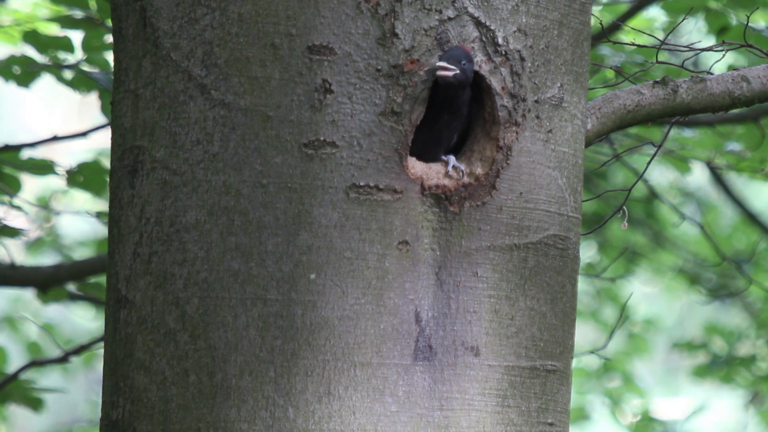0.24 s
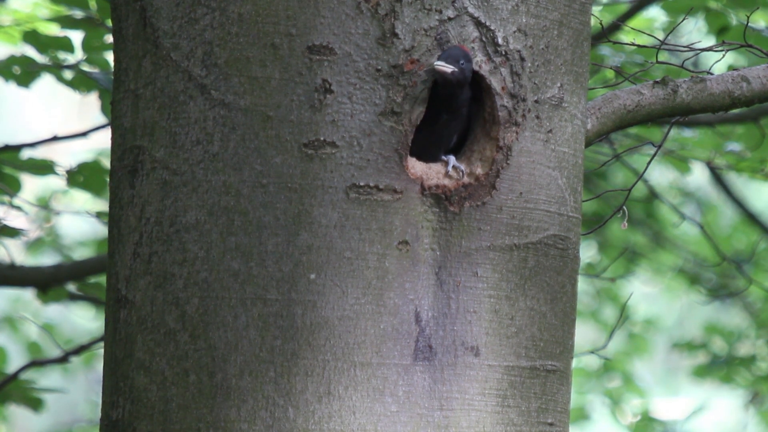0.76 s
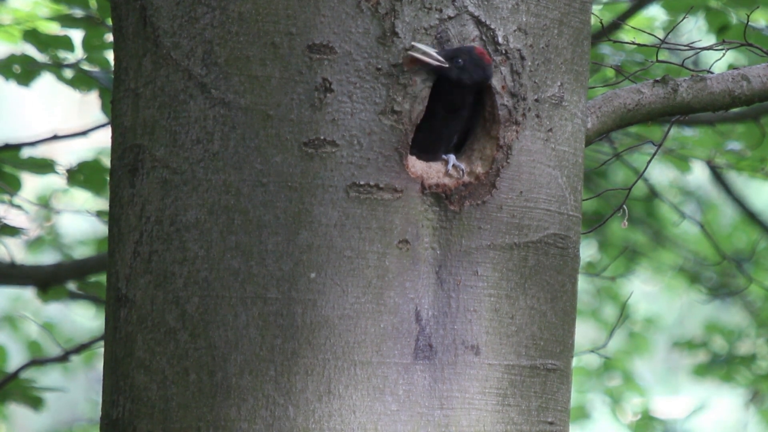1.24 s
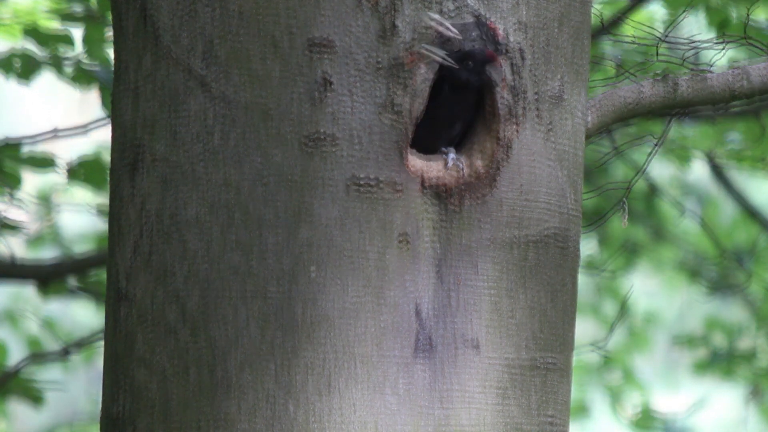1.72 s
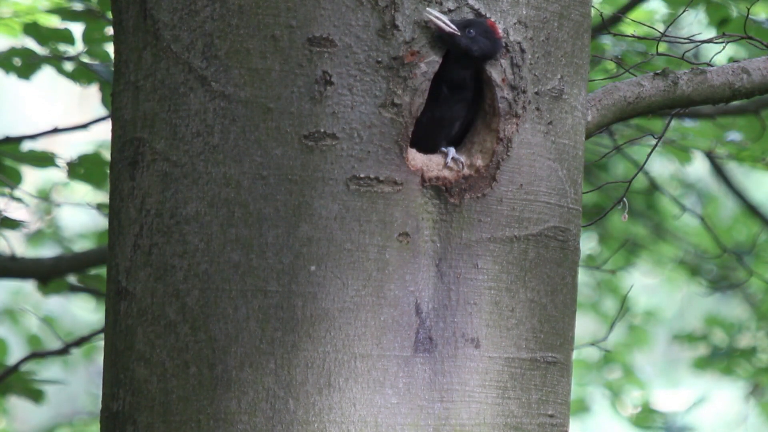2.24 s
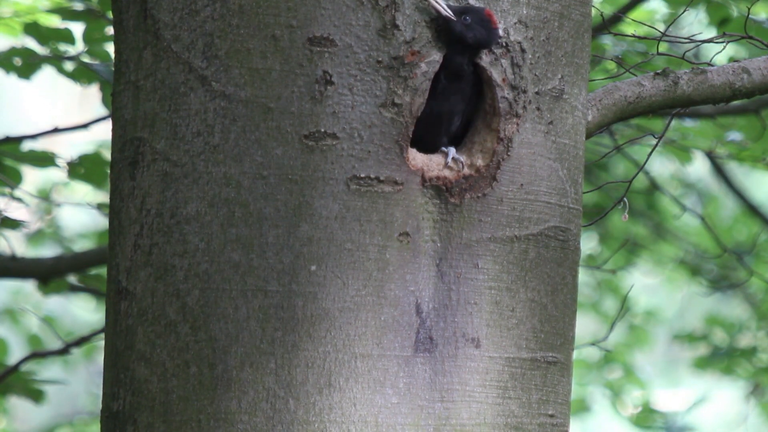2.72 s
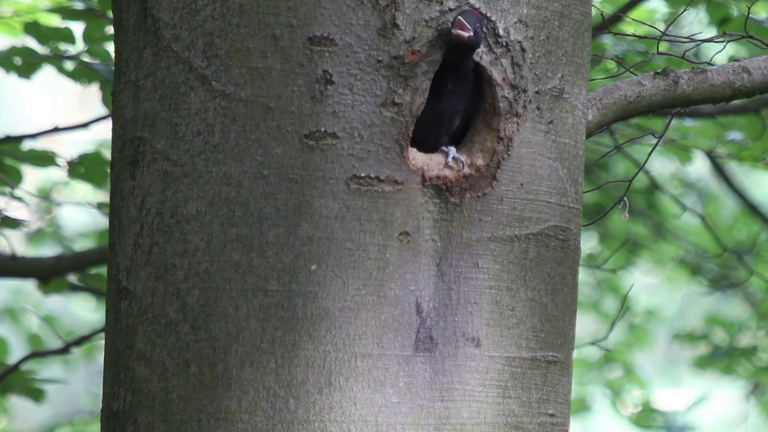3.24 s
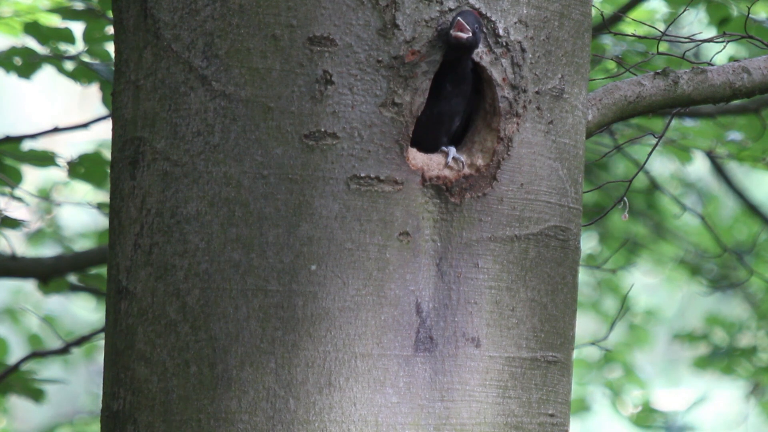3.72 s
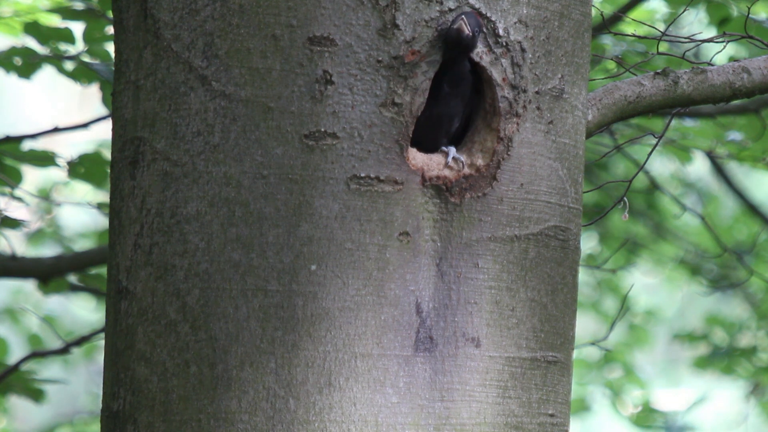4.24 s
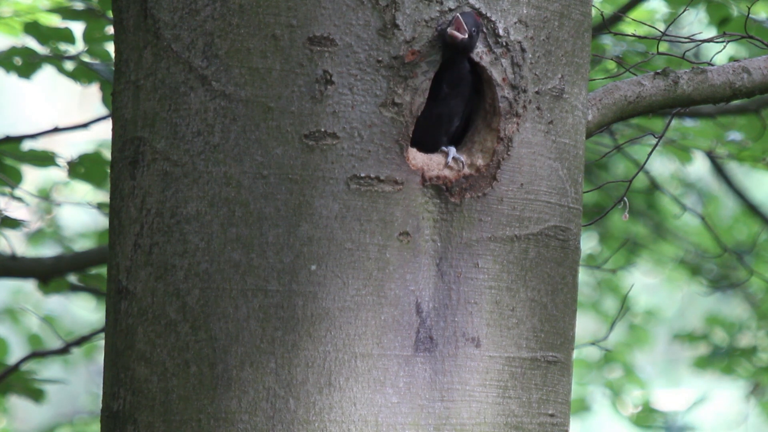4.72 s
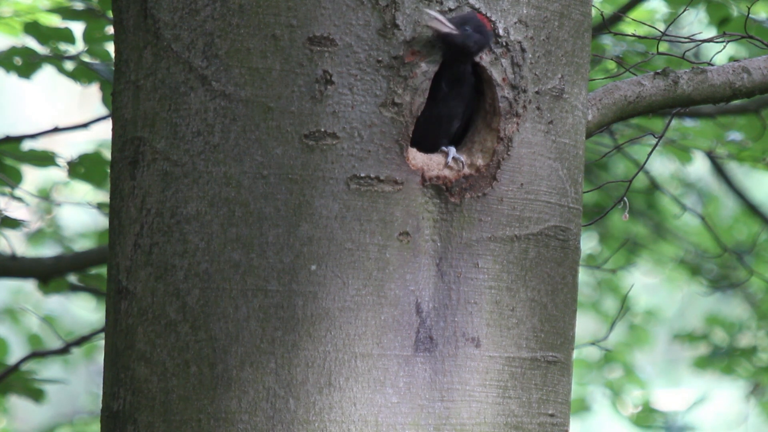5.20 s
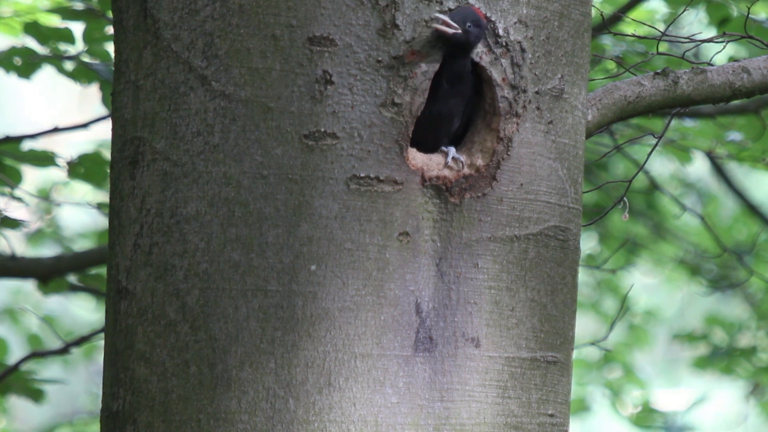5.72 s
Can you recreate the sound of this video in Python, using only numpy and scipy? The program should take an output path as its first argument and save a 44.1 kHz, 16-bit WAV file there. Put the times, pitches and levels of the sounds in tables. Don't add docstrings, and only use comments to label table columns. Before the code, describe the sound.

In a reverberant beech wood, a near finch opens with a fast trill ending in a flourish, then repeats falling sweeps and later trills again. A young woodpecker clucks softly, then gives a burst of short nasal yelps around two seconds. Bill snaps follow mid-way, the middle one hard, with faint hollow thuds. Fainter birds sing behind. Low traffic rumble, soft woodland wash and slight microphone hiss continue throughout.

```python
import sys
import numpy as np
from scipy import signal
from scipy.fft import rfft, irfft, next_fast_len
from scipy.io import wavfile
from scipy.ndimage import uniform_filter1d, map_coordinates

SR = 44100
rng = np.random.default_rng(int(sys.argv[2]) if len(sys.argv) > 2 else 0)


def volts_from_db(level):
    exponent = np.asarray(level, float) / 20
    return 10 ** exponent


def unload_wav(signal):
    wavfile.write(
        sys.argv[1],
        SR,
        np.round(np.clip(np.atleast_2d(signal).T, -1, 1) * 32767).astype(np.int16),
    )


N = 262836


def unit(x):
    return x / np.sqrt(np.mean(x ** 2) + 1e-20)


def along(points, hz):
    point_hz, value = np.transpose(points)
    return np.interp(np.log(hz + 1), np.log(point_hz + 1), value)


def wobble(rate_hz, size=N):
    knots = rng.standard_normal(int(size * rate_hz / SR) + 4)
    return map_coordinates(knots, [np.arange(size) * rate_hz / SR])


def add(track, start_s, sound):
    start = round(start_s * SR)
    part = track[max(start, 0):start + len(sound)]
    part += sound[max(-start, 0):][:len(part)]


def stroke(rows, rough, overtones):
    s, hz, db = np.transpose(rows)
    size = int((s[-1] - s[0]) * SR) + 2
    t = s[0] + np.arange(size) / SR
    glide_hz = uniform_filter1d(np.interp(t, s, hz), size=45)
    pitch_hz = glide_hz * (1 + .02 * rough * wobble(500, size=size))
    ends = np.clip(np.minimum(t - t[0], t[-1] - t) / .0015, 0, 1)
    level_db = np.interp(t, s, db) + 4.5 * min(rough, .7) * wobble(250, size=size)
    k = np.arange(1, 10)[:, None]
    phase = 2 * np.pi * np.cumsum(pitch_hz) / SR
    tones = volts_from_db(overtones(k, k * pitch_hz)) * np.sin(k * phase)
    return np.sqrt(2) * ends * volts_from_db(level_db) * tones.sum(0)


def wood(x, wet_db, echoes, onset_s):
    # (frequency [Hz], t60 [s])
    decay_t60 = [(1000, 0.54), (2500, 0.89), (3500, 0.96), (5000, 0.97), (8000, 0.35)]
    # (frequency [Hz], level [dB])
    scatter_colour = [(1200, 5.5), (2200, -4), (3200, -4.5), (4400, -7.5), (5500, -5.5), (7500, 0.5)]
    hz, t, z = signal.stft(rng.standard_normal(SR * 3 // 4), SR, nperseg=256)
    decay = volts_from_db(-60 * t / along(decay_t60, hz)[:, None])
    buildup = 1 - np.exp(-t / onset_s)
    tail = signal.istft(z * decay * buildup, SR, nperseg=256)[1]
    tail = volts_from_db(wet_db) * tail / np.linalg.norm(tail)
    for delay_s, db in echoes:
        add(tail, delay_s, volts_from_db(db) * unit(rng.standard_normal(90)) / np.sqrt(90))
    colour = volts_from_db(along(scatter_colour, np.fft.rfftfreq(len(tail), 1 / SR)))
    tail = irfft(rfft(tail) * colour, len(tail))
    wet = signal.fftconvolve(x, tail)
    index = np.arange(len(wet))
    knots = index[::700]
    waver = np.interp(index, knots, rng.standard_normal(len(knots)))
    wet = np.interp(index + 7 * waver, index, wet)
    add(wet, 0, x)
    return wet


def yelp(high_s, plateau_s, hz, db):
    high_hz, step_s, fall_s, fall_hz = 1650, .003, .0095, 320
    onset_db, push_db_per_s, fade_db = -6, 800, -3
    top_db = db + push_db_per_s * high_s
    return [(0, .95 * high_hz, top_db + onset_db),
            (.6 * high_s, 1.03 * high_hz, top_db),
            (high_s, .97 * high_hz, top_db - 5),
            (high_s + step_s, hz, db),
            (plateau_s, hz, db),
            (plateau_s + fall_s, hz - fall_hz, db + fade_db)]


def woodpecker(wet_db, echoes, onset_s):
    # (time [s], high part [s], plateau end [s], plateau pitch [Hz], plateau level [dB])
    yelp_table = [
        (1.712, .001, .016, 1452, -37),
        (1.9635, .002, .016, 1275, -41.5),
        (2.122, .007, .013, 1280, -40.5),
        (2.369, .005, .013, 1270, -40.5),
        (2.584, .0095, .018, 1265, -40.5),
    ]
    # (time [s], peak level [dB], pitch [Hz], second harmonic [dB])
    cluck_table = [(0.0252, -39, 1700, -18), (0.2028, -44, 1660, -11), (0.451, -44, 1636, -5),
                   (1.7123, -41, 1730, -20), (2.122, -44, 1725, -20), (1.7994, -34.5, 1778, -14),
                   (2.165, -45.5, 1520, -2.5), (2.3717, -43, 1795, -20), (2.419, -41, 1760, -20),
                   (2.642, -37.5, 1720, -17), (2.824, -45.5, 1530, -20), (5.4256, -96, 1710, -17)]
    # (frequency [Hz], level [dB])
    throat_gain = [(900, -22), (1400, -13), (1700, -13), (2100, 0), (3400, 0), (3900, -10), (4400, -17),
                   (5100, -25), (5900, -15), (7500, -18), (8800, -31), (11700, -28), (14000, -48)]

    def throat(k, hz):
        f0_hz = hz / k
        purity = np.clip((f0_hz - 1500) / 100, 0, 1) + np.clip((1230 - f0_hz) / 150, 0, 1)
        return along(throat_gain, hz) - (12 * (k == 3) + 9 * (k > 3)) * purity - 200 * (hz > 15000)

    track = np.zeros(N)
    for s, *shape in yelp_table:
        add(track, s, wood(stroke(yelp(*shape), .55, throat), wet_db, echoes, onset_s))
    for s, db, hz, second_db in cluck_table:
        rows = [(0, hz * 1.02, db - 6), (.004, hz, db - 3), (.011, hz * .98, db - 9)]
        cluck = stroke(rows, .2, lambda k, f: second_db * (k - 1) - 15 * (k > 2))
        add(track, s - .0015, wood(cluck, wet_db - 7, [], onset_s))
    return track


def snaps():
    # (time [s], peak level [dB], knock level re peak [dB])
    snap_table = [
        (3.358, -38, -28),
        (3.4705, -23, -19),
        (3.765, -40, -28),
    ]
    track, t = np.zeros(N), np.arange(600) / SR
    tick = np.zeros(600)
    for hz, gain in [(6000, 1), (8300, .35), (10800, .12), (2600, .3)]:
        tick += gain * np.sin(2 * np.pi * hz * t)
    knock = np.sin(2 * np.pi * 900 * t) + np.sin(2 * np.pi * 410 * t)
    for s, db, knock_db in snap_table:
        add(track, s + .0003, volts_from_db(db + 2.5 - 60 * t / .0022) * np.minimum(t / .0003, 1) * tick)
        add(track, s + .0008, volts_from_db(db + knock_db + 4 - 60 * t / .015) * knock)
    return track


def thuds():
    # (time [s], peak level [dB], pitch [Hz])
    thud_table = [(1.875, -48.5, 578), (1.974, -39.5, 459), (2.052, -43.5, 485), (2.165, -42, 433),
                  (2.199, -42.5, 468), (2.271, -45, 425), (2.509, -45.5, 597), (2.945, -46, 596),
                  (3.173, -45, 546), (5.584, -40, 460), (5.811, -47, 460), (5.893, -45, 428),
                  (5.938, -48, 459)]
    track, t = np.zeros(N), np.arange(SR // 8) / SR
    for s, db, hz in thud_table:
        envelope = volts_from_db(db + 3 - 60 * t / .13) * (1 - np.exp(-t / .007))
        add(track, s - .004, envelope * np.sin(2 * np.pi * hz * t))
    return track


def sing(song, rough, wet_db, echoes, onset_s):
    def pure(k, hz):
        return -34.0 * (k - 1) - 200 * (hz > 15000)

    track = np.zeros(N)
    for syllable, times in song:
        first_s = syllable[0][0][0]
        last_s = max(rows[-1][0] for rows in syllable)
        for s, db in times:
            note = np.zeros(int((last_s - first_s) * SR) + 9)
            for rows in syllable:
                add(note, rows[0][0] - first_s, volts_from_db(db) * stroke(rows, rough, pure))
            add(track, s + first_s, wood(note, wet_db, echoes, onset_s))
    return track


def phrases(rows):
    times = []
    for first_s, last_s, gap_s, db in rows:
        times += [(s, db) for s in np.arange(first_s, last_s + gap_s / 2, gap_s)]
    return times


def near_finch():
    # (time in syllable [s], pitch [Hz], level [dB])
    trill = [
        [(-.029, 5700, -22), (-.024, 4200, -4), (-.02, 3850, 0), (-.012, 3250, -13)],
        [(-.001, 2050, -11), (.01, 2450, -7), (.016, 2950, -8), (.021, 3230, 0), (.032, 3200, 0),
         (.044, 2050, -10)],
    ]
    sweep = [
        [(-.003, 3700, -10), (.003, 4300, 0), (.015, 4270, -13)],
        [(.027, 6900, -24), (.038, 5450, -4), (.045, 4650, -11), (.056, 3920, -1), (.074, 3560, -2),
         (.088, 3200, -6), (.106, 2900, -10)],
    ]
    flourish = [
        [(0, 5150, -14), (.014, 5650, -3), (.02, 4300, -20)],
        [(.025, 4300, -11), (.042, 5100, -3), (.052, 3960, 0), (.063, 3350, -7)],
        [(.076, 3420, -6), (.086, 3900, 0), (.093, 4400, -4), (.104, 3250, -5), (.124, 2050, -20)],
    ]
    arch = [
        [(-.006, 3800, -16), (.002, 5300, -4), (.009, 6800, -12), (.02, 7400, -17)],
        [(.019, 5400, -8), (.021, 5750, 0), (.027, 7000, -11)],
        [(.027, 5700, -8), (.032, 5250, 2), (.041, 5000, -6)],
    ]
    pip = [
        [(0, 4850, -10), (.017, 5400, -2)],
        [(.03, 4950, -8), (.065, 4850, -6)],
    ]
    # (first time [s], last time [s], gap [s], level [dB])
    trill_phrases = [
        (.003, .445, .1105, -38),
        (3.826, 4.503, .1127, -38),
        (4.626, 4.63, .11, -38),
    ]
    # (time [s], level [dB])
    sweep_times = [(2.175, -44), (2.355, -44), (2.542, -42), (2.726, -40), (2.91, -40), (3.09, -40),
                   (3.269, -40), (3.451, -39), (3.636, -37)]
    flourish_times = [
        (.552, -35),
        (4.734, -35),
    ]
    arch_times = [
        (.756, -41),
        (.838, -41.5),
        (4.938, -41),
        (5.021, -43),
    ]
    pip_times = [
        (1.92, -54),
        (2.058, -48),
    ]
    broken_sweep = [sweep[0], sweep[1][:-1]]
    song = [(trill, phrases(trill_phrases)), (broken_sweep, sweep_times[:3]), (sweep, sweep_times[3:]),
            (flourish, flourish_times), (arch, arch_times), (pip, pip_times)]
    return sing(song, .4, 2, [(.02, -14), (.037, -12)], .018)


def far_finch():
    # (time in syllable [s], pitch [Hz], level [dB])
    drip = [
        [(0, 5850, -6), (.003, 5850, 0), (.008, 5800, -8)],
        [(.006, 5400, -10), (.014, 5000, -5), (.02, 4400, -10), (.03, 3700, -5), (.045, 2700, -9)],
    ]
    tick = [
        [(-.002, 5300, -6), (.002, 5250, 0), (.005, 4600, -8), (.009, 3900, -8)],
    ]
    # (time [s], level [dB])
    drip_times = [(.108, -54), (.232, -54), (.366, -56), (1.097, -60), (1.216, -60), (1.333, -58),
                  (1.451, -54), (1.564, -54), (1.681, -55), (3.955, -59), (4.076, -55), (4.208, -59),
                  (4.321, -59), (4.436, -55), (4.554, -59), (4.667, -57), (5.12, -56), (5.243, -54),
                  (5.365, -53)]
    tick_times = [
        (2.712, -51),
        (3.078, -55),
        (3.62, -53),
    ]
    return sing([(drip, drip_times), (tick, tick_times)], .7, 1.5, [(.02, -15)], .022)


def drawling_finch():
    # (time in syllable [s], pitch [Hz], level [dB])
    drawl = [
        [(-.005, 2350, -16), (.04, 2330, -1), (.08, 2420, -8)],
        [(-.005, 2850, -16), (.03, 2900, -6), (.075, 2800, -6)],
        [(.078, 3000, -10), (.092, 3650, -1), (.115, 4050, 2), (.18, 4480, -4), (.3, 4520, -15)],
        [(.11, 3400, -12), (.18, 3700, -7), (.28, 3000, -13)],
    ]
    # (time [s], level [dB])
    drawl_times = [
        (0.956, -46.5),
    ]
    return sing([(drawl, drawl_times)], 1.9, 2.5, [(.03, -13)], .015)


def murmuring_birds():
    # (time [s], pitch [Hz], level [dB])
    murmur = [
        [(5.0, 2700, -72), (5.2, 3100, -71), (5.7, 3000, -72)],
        [(5.46, 3600, -70), (5.95, 4200, -72)],
        [(5.82, 2900, -77), (5.95, 3400, -69)],
        [(5.4, 1700, -75), (5.55, 1650, -71), (5.72, 1450, -74)],
        [(3.32, 2000, -68), (3.45, 2300, -66), (3.6, 1900, -72)],
    ]
    # (time [s], level [dB])
    murmur_times = [
        (0.0013, 2.5),
    ]
    return sing([(murmur, murmur_times)], 3.2, 6, [(.03, -13)], .015)


def rush(spectrum):
    size = next_fast_len(N + 8192)
    gain = volts_from_db(along(spectrum, np.fft.rfftfreq(size, 1 / SR)))
    return unit(irfft(rfft(rng.standard_normal(size)) * gain, size)[:N])


def background():
    # (time [s], level [dB])
    traffic_level = [(0.0, -51.5), (0.58, -51.5), (0.65, -46), (1.46, -55.5), (1.54, -50), (2.39, -56),
                     (3.82, -50.5), (3.87, -55.5), (4.15, -47.5), (4.55, -57), (4.7, -49.5), (5.18, -52),
                     (5.94, -58.5), (5.96, -65)]
    # (frequency [Hz], density [dB per Hz])
    deep_colour = [(11, -34), (18, -5), (27, -13.5), (65, -0.5), (150, -6.5), (200, -70), (330, -120)]
    drone_colour = [(65, -43), (110, -8.5), (172, 1.5), (227, -1.5), (281, -6.5), (300, -18), (390, -17.5),
                    (660, -120)]
    wash_colour = [(150, -44), (260, -11.5), (315, 1), (450, -6), (580, -2.5), (800, -6), (1200, -7),
                   (2000, -13.5), (3000, -13), (4700, -15), (6500, -24.5), (9000, -29), (12000, -41.5)]
    hiss_colour = [(20, -1), (1000, -10), (8000, 1.5), (12000, 3), (16500, 2)]
    s, db = np.transpose(traffic_level)
    drone_db = np.interp(np.arange(N) / SR, s, db)
    deep = volts_from_db(-50.5 + .96 * wobble(4.16) + .13 * wobble(12)) * rush(deep_colour)
    drone = volts_from_db(drone_db - .25 + 1.2 * wobble(4.8)) * rush(drone_colour)
    wash_db = -51 + .033 * (drone_db - drone_db.mean())
    wash = volts_from_db(wash_db + .5 * wobble(4.16)) * rush(wash_colour)
    return deep + drone + wash + volts_from_db(-61.5) * rush(hiss_colour)


def scene():
    calls = woodpecker(2.5, [(.028, -7), (.047, -9), (.065, -12)], .018)
    knocks = wood(snaps() + thuds(), -14, [(.01, -20)], .012)[:N]
    finches = near_finch() + far_finch() + drawling_finch()
    return (calls + knocks + finches + murmuring_birds() + background())[None]


def roll_off(x):
    return signal.sosfilt(signal.butter(12, 16190, fs=SR, output="sos"), x)


def record(dry):
    mix = dry + .001
    return roll_off(mix)


dry = scene()
out = record(dry)
unload_wav(out)
```